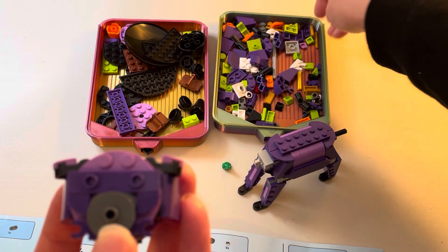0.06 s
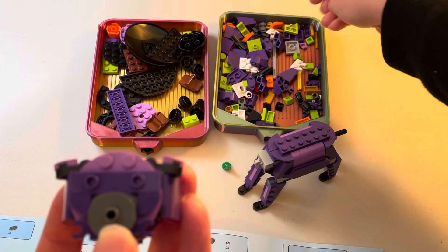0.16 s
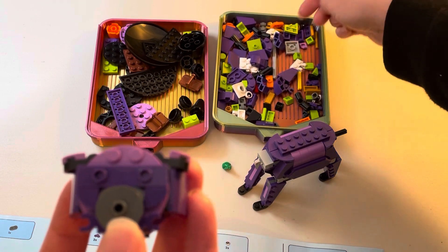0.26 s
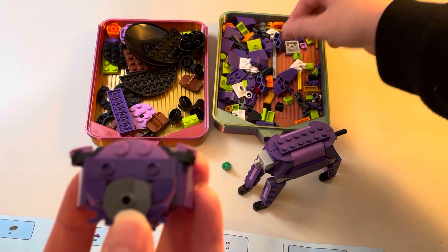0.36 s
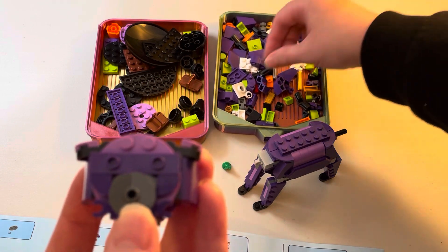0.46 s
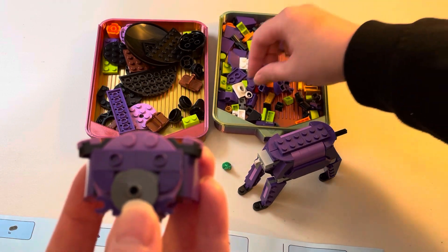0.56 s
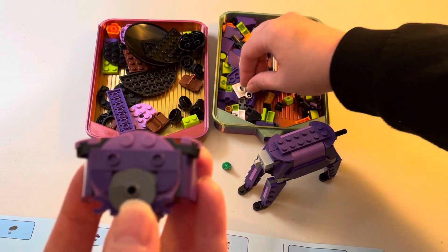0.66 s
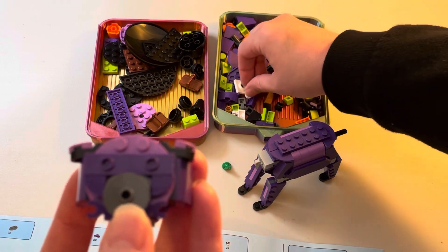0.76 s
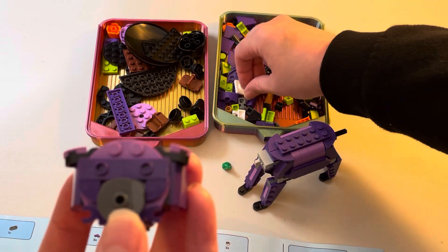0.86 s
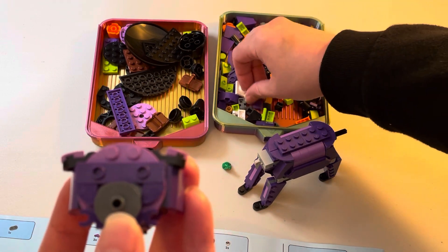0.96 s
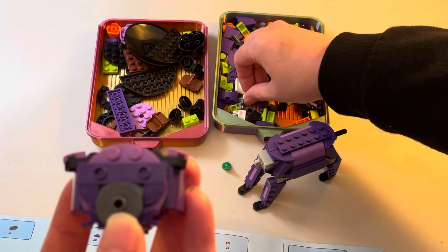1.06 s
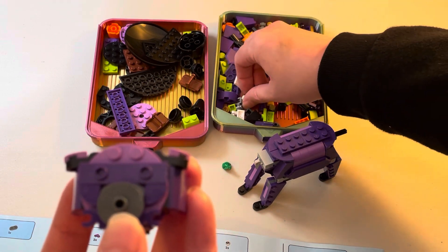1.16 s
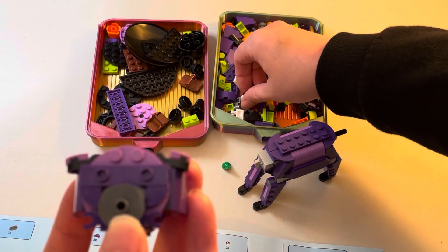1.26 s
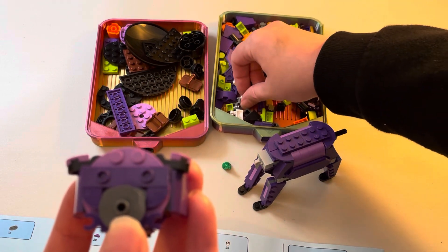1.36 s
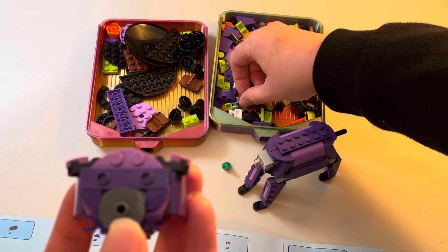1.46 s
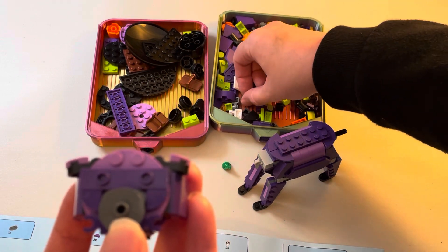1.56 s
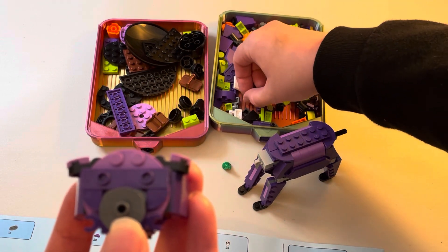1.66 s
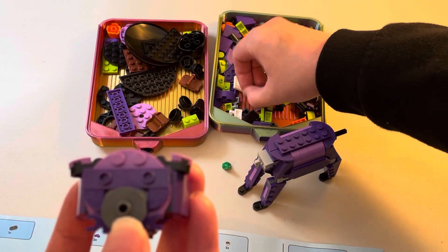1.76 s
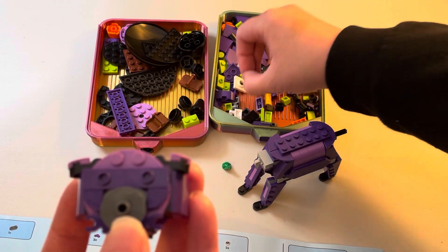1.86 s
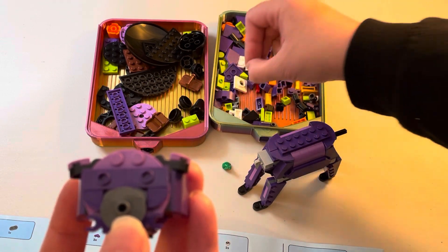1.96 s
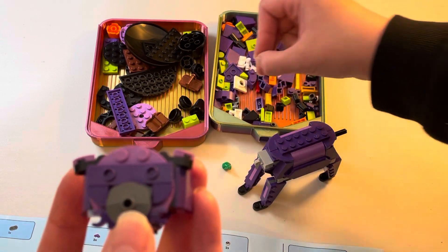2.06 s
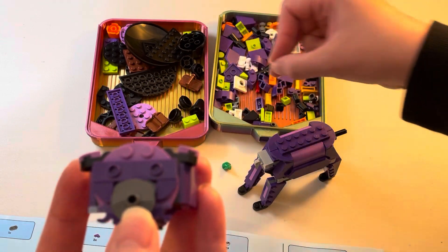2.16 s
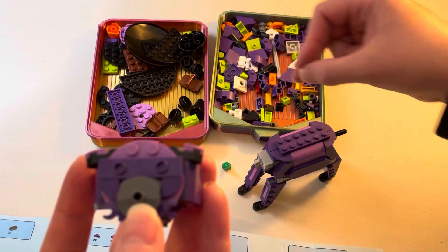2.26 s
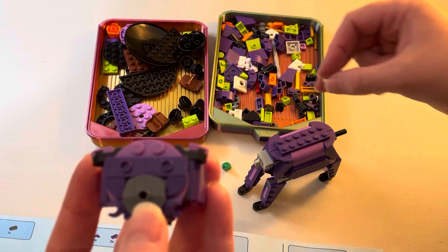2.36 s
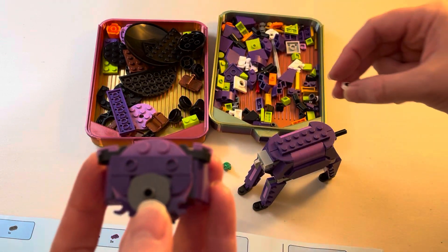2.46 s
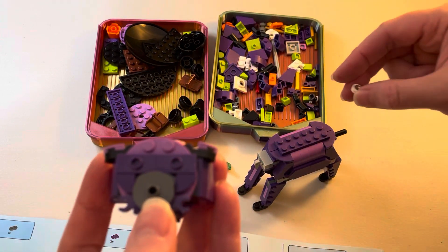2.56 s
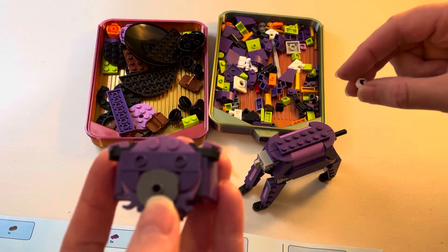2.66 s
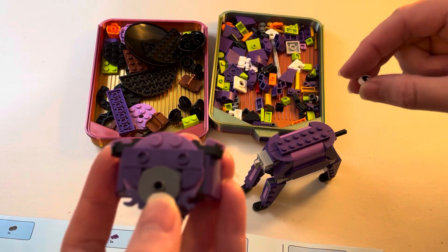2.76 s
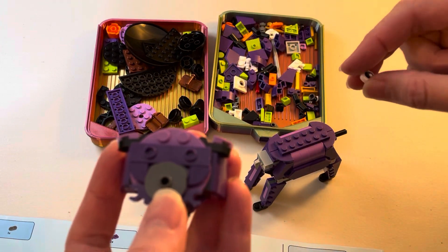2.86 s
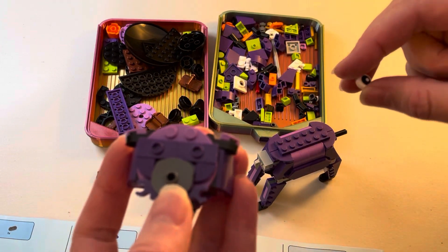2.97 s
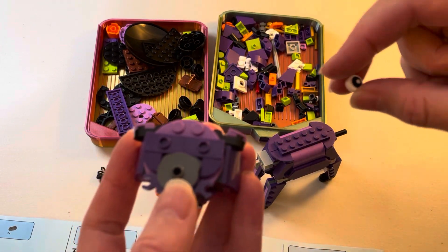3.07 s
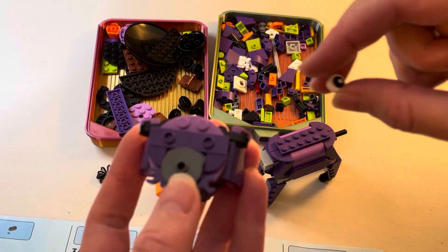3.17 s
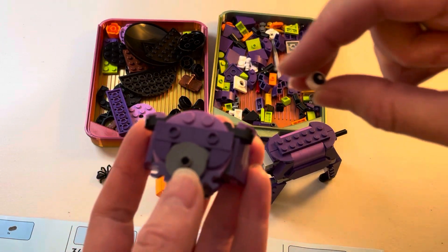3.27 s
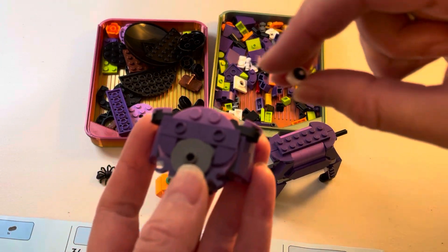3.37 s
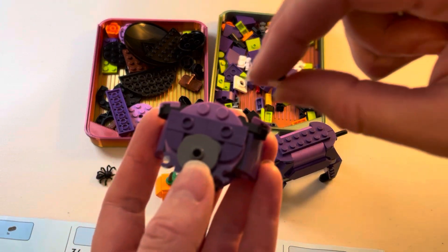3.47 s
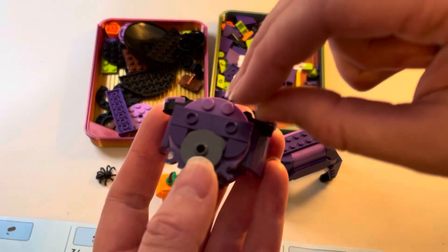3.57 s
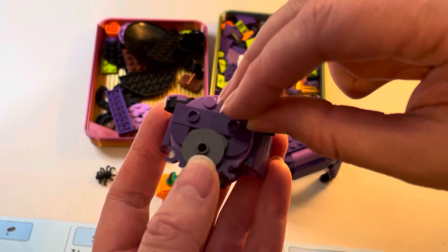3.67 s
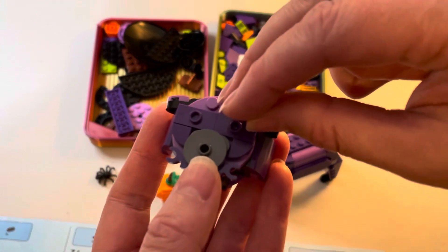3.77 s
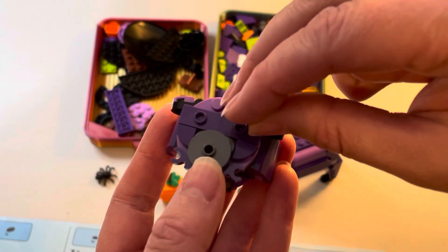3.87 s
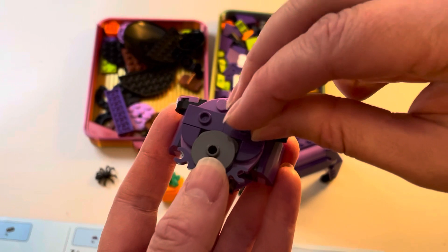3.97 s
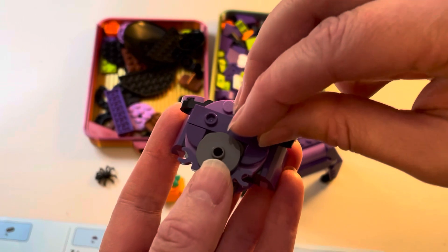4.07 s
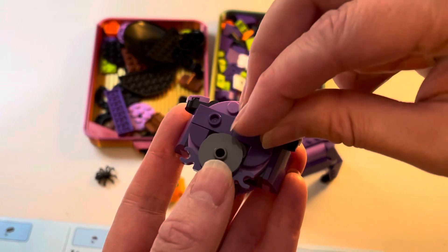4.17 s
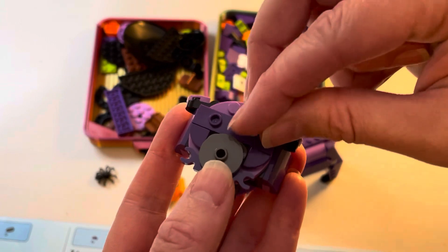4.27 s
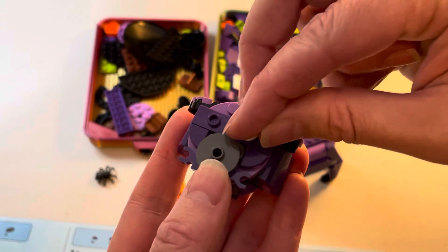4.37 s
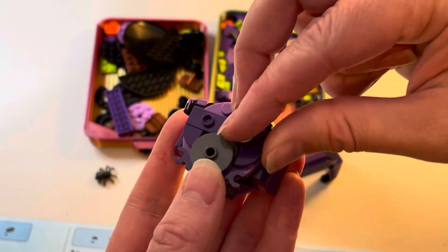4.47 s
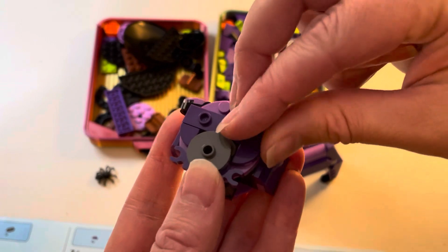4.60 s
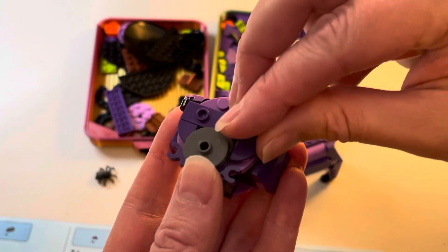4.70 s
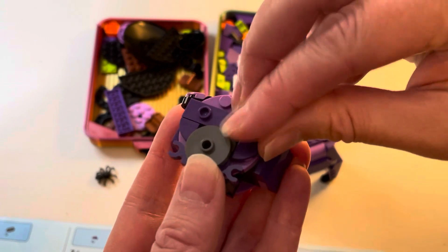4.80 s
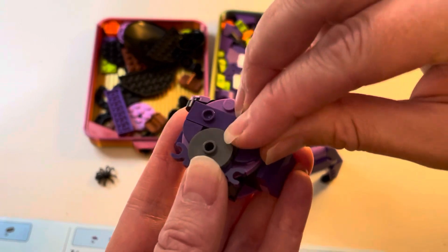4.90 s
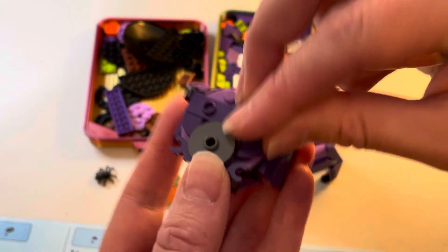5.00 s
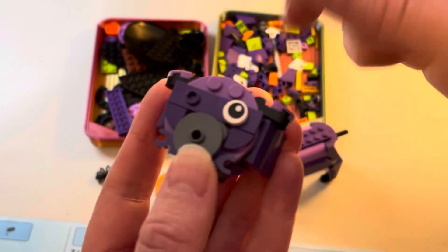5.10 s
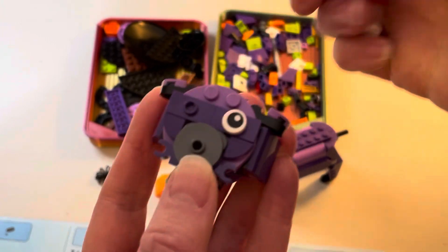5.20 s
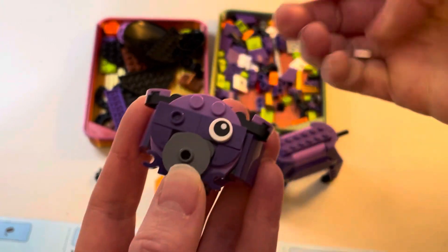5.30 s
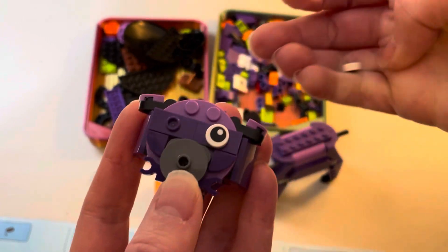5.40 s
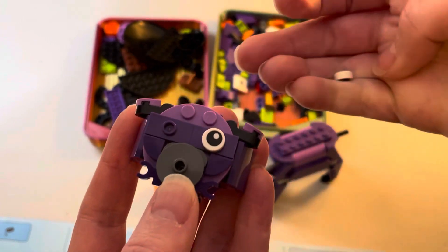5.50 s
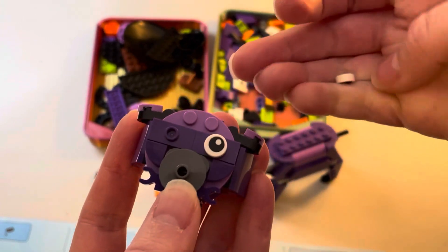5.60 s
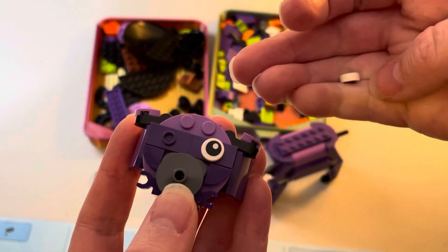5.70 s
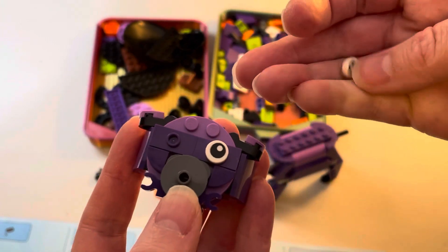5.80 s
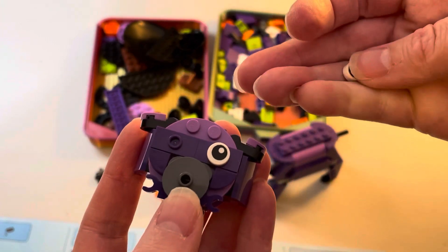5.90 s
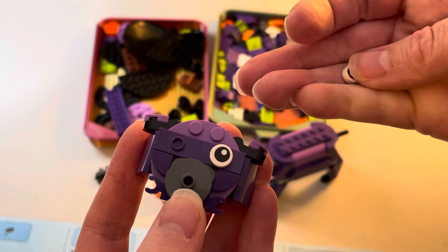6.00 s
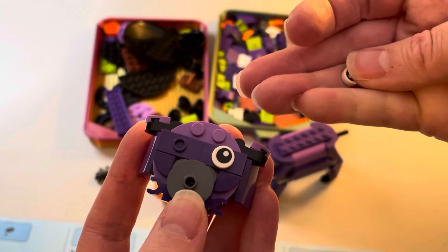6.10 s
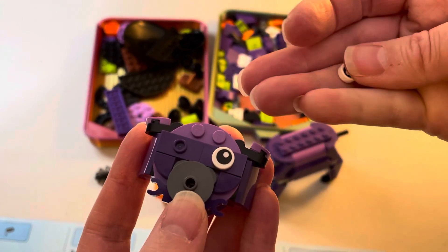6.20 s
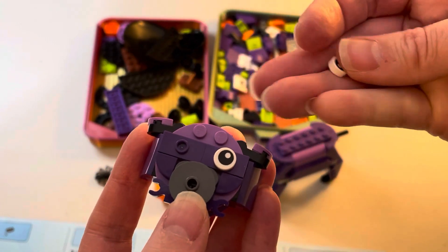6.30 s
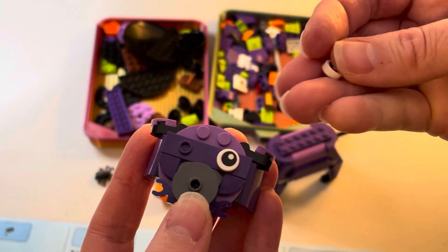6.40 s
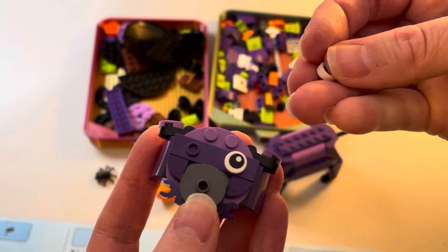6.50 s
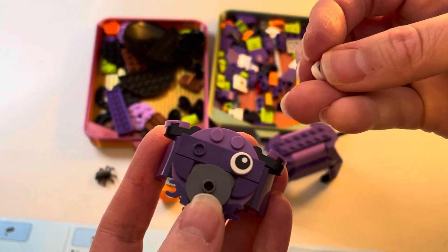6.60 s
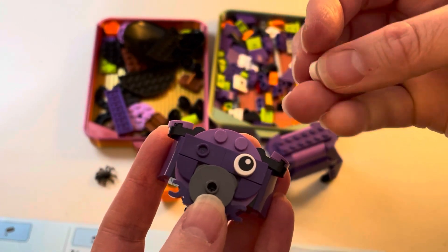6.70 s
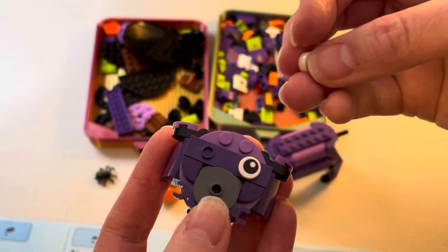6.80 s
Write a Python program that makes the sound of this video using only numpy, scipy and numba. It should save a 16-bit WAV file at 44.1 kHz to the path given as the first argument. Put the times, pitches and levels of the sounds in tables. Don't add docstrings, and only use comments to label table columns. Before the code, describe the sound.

In a small quiet room, fingers dig through a tray of loose plastic bricks, making a short avalanche of bright clatter with dull tray and table thuds. The rattling thins out and stops. After near silence, tiny clicks close to the microphone lead to one very sharp snap as a piece presses onto a hollow model, then faint skin rubbing over low room hum.

```python
import sys
import numpy as np
from scipy import signal
from scipy.fft import rfft, irfft, next_fast_len
from scipy.io import wavfile
from scipy.ndimage import uniform_filter1d
from numba import njit

SR = 44100
rng = np.random.default_rng(int(sys.argv[2]) if len(sys.argv) > 2 else 0)


def voltage_ratio(decibels):
    exponent = np.asarray(decibels, float) / 20
    return 10 ** exponent


def file_out(sig):
    cols = np.atleast_2d(sig).T
    lim = np.clip(cols, -1, 1)
    pcm = np.round(lim * 32767).astype(np.int16)
    wavfile.write(sys.argv[1], SR, pcm)


N = 302085

# pitch in Hz, 60 dB decay in seconds, level in dB.
TRAY_MODES = [(279, 0.07, 0), (329.2, 0.06, -7.5), (430, 0.045, 3.5), (543, 0.026, 2), (630, 0.034, 0.5),
              (891.5, 0.03, -5.5), (1270, .02, -8)]
# peak, rise and fall in seconds, rattle in dB, tray in dB.
HEAP_PUSHES = [(0.03, 0.058, 0.032, -55, -55), (0.692, 0.0038, 0.2, -44.5, -61.5),
               (0.775, 0.035, 0.034, -36, -47), (0.962, 0.019, 0.093, -34, -50.5),
               (1.04, .05, 0.042, -46.5, -62), (1.078, 0.0042, 0.021, -33.5, -39.5),
               (1.146, 0.014, 0.073, -40.5, -52.5), (1.18, 0.035, 0.025, -48, -54),
               (1.3, 0.091, 0.2, -69, -64), (1.353, 0.002, 0.045, -46.5, -57.5),
               (1.475, 0.067, 0.023, -51.5, -59), (1.575, 0.01, 0.0074, -54, -72),
               (1.645, 0.057, 0.038, -72, -100), (2.31, 0.0044, 0.024, -78, -75),
               (2.378, 0.0082, 0.029, -84, -75)]
TRAY_DETUNE = 0.1


def at(points, hz):
    point_hz, value = np.transpose(points)
    return np.interp(np.log(hz + 1), np.log(point_hz + 1), value)


def colour(x, gain):
    size = next_fast_len(N + 8192)
    spectrum = rfft(x, size) * gain(np.fft.rfftfreq(size, 1 / SR))
    return irfft(spectrum, size)[..., :N]


def unit(x):
    return x / np.sqrt(np.mean(x ** 2))


@njit
def rings(start, hz, t60, size, n):
    out = np.zeros(n)
    for k in range(len(start)):
        turn = np.exp(2j * np.pi * hz[k] / SR - np.log(1000) / (t60[k] * SR))
        z = size[k] + 0j
        for i in range(int(start[k]), min(int(start[k] + t60[k] * SR), n)):
            out[i] += z.imag
            z *= turn
    return out


def strike(s, db, modes, detune=0.022, scatter_db=2.5):
    hz, t60, mode_db = np.transpose(modes)
    chance = rng.standard_normal((len(s), len(hz), 2))
    polarity = (-1.) ** np.arange(len(hz))
    size = voltage_ratio(db[:, None] + mode_db + scatter_db * chance[..., 0]) * polarity
    tuned = hz * (1 + detune * chance[..., 1])
    start = np.repeat(s * SR, len(hz))
    return rings(start, tuned.ravel(), np.tile(t60, len(s)), size.ravel(), N)


def crack(s, db, low_hz, high_hz):
    pulses = np.zeros(N)
    np.add.at(pulses, (s * SR).astype(int), voltage_ratio(db))
    sos = signal.butter(3, [low_hz, high_hz], "bandpass", fs=SR, output="sos")
    band = signal.sosfilt(sos, pulses) * SR / (2 * (high_hz - low_hz))
    return band - 0.081 * np.roll(band, int(0.00017 * SR))


def patter(count, size, low_hz, high_hz, cycles, spread_db):
    when, luck = rng.random((count, 2)).T
    place = (np.arange(size) + rng.random((count, size))) / size
    hz = low_hz + (high_hz - low_hz) * place
    t60 = cycles / np.sqrt(hz * 4000)
    force = voltage_ratio(-spread_db * np.log(luck + 1 / 100))[:, None] * rng.standard_normal((count, size))
    start = np.repeat(when * N, size)
    return unit(rings(start, hz.ravel(), t60.ravel(), (force / np.sqrt(t60)).ravel(), N))


def swells(rows, column):
    rows = np.array(rows)
    late = np.arange(N) / SR - rows[:, :1]
    rise, fall, db = rows[:, [1]], rows[:, [2]], rows[:, [column]]
    span_db = 20
    return voltage_ratio(db - span_db * np.maximum(-late / rise, late / fall)).sum(axis=0)


def knocks():
    # start in seconds, peak in dB, pitch in Hz, treble in dB.
    raked = [(0.6931, -34, 3100, -13), (0.7013, -36.5, 3550, -16), (0.7093, -32, 5160, -24),
             (0.7274, -34.5, 5010, -18.5), (0.7342, -34.5, 4540, -23.5), (0.7448, -31, 4730, -23),
             (0.7587, -26.5, 4730, -16), (0.7628, -31, 5010, -23.0), (0.7753, -25, 5270, -19.5),
             (0.7788, -30.5, 4670, -17), (0.782, -32.5, 1740, -14.5), (0.7868, -27.5, 4580, -18.5),
             (0.7983, -33.5, 5360, -17.5), (0.802, -32.5, 5060, -17), (0.8176, -37.7, 5060, -22),
             (0.8326, -39.5, 2110, -18.5), (0.8395, -42, 3180, -16.5), (0.843, -42, 5490, -17),
             (0.8727, -49.5, 1700, -27), (0.8764, -53, 1850, -20.5), (0.8987, -49.5, 4860, -22.5),
             (0.9048, -50.5, 2230, -26.5), (0.9181, -45, 2840, -26.5), (0.9235, -46, 2920, -28),
             (0.9326, -48.5, 1890, -19), (0.9449, -42.5, 3010, -17.5), (0.956, -29.5, 4130, -12),
             (0.9615, -27.5, 5270, -13.5), (0.9663, -27, 5310, -5), (0.9757, -21.5, 4670, -13),
             (0.9822, -28, 5380, -17.0), (0.9857, -28, 4670, -15), (0.9895, -22.5, 4750, -16),
             (1.0092, -27.5, 4690, -11), (1.0194, -30, 4750, -14.5)]
    # start in seconds, peak in dB, pitch in Hz,
    # treble in dB.
    dug = [(1.0346, -33, 4750, -10), (1.0404, -32.5, 4730, -13.7), (1.0482, -31, 5400, -15),
           (1.0524, -32.5, 3180, -11.4), (1.0589, -35.5, 3350, -19), (1.0761, -28, 3200, -22.2),
           (1.0834, -25.5, 1950, -24), (1.0865, -29.5, 3290, -26), (1.1053, -38.5, 4880, -21.8),
           (1.1172, -33, 1850, -23.0), (1.1249, -37, 1800, -18), (1.1424, -33.5, 5180, -16),
           (1.1504, -28, 3350, -20), (1.1538, -33.5, 3050, -20.9), (1.1701, -34.5, 5190, -22),
           (1.1766, -29.5, 3280, -20.2), (1.1805, -25.5, 3080, -19), (1.1861, -35, 2410, -13),
           (1.2177, -36, 5050, -15), (1.2246, -34.5, 5060, -22.6), (1.2434, -43, 1800, -23),
           (1.273, -48, 3310, -26), (1.2958, -36.5, 5070, -33), (1.3035, -47, 2330, -30),
           (1.322, -41, 5200, -43), (1.3304, -61, 2520, -31), (1.3517, -38.5, 4710, -22),
           (1.3627, -26.5, 5230, -22), (1.3736, -43.5, 4860, -24.5), (1.3932, -32, 4670, -35),
           (1.3998, -39, 4730, -32), (1.4159, -35.5, 4520, -36), (1.4279, -43, 2100, -32),
           (1.4331, -30.5, 4840, -30), (1.4393, -40.1, 2020, -37), (1.4523, -39, 4770, -30),
           (1.4659, -46, 2020, -30), (1.4709, -35, 4700, -20), (1.4796, -36, 2500, -30),
           (1.4936, -46, 2060, -28), (1.4972, -43.5, 1930, -27), (1.5027, -55, 3000, -27.1),
           (1.507, -54, 2530, -26), (1.511, -50.3, 3180, -29), (1.5184, -66, 2020, -28)]
    # start in seconds, peak in dB, pitch in Hz,
    # tray in dB.
    settling = [(0.0144, -43, 1540, -11), (0.028, -40, 1800, -7), (0.036, -43, 3020, -15),
                (0.0471, -47, 4850, -4), (0.054, -48, 1590, -15), (0.0844, -65, 980, 1),
                (1.559, -48, 3000, -22), (1.5622, -49, 3020, -31), (1.5703, -38.5, 3110, -41),
                (1.576, -44, 1910, -30), (1.583, -61, 4200, -28), (1.6242, -54, 4000, -32),
                (1.6456, -45, 2150, -38), (1.679, -59.5, 3800, -19), (2.284, -56, 5280, -16),
                (2.3074, -47, 3090, -19), (2.3078, -47, 5460, -20), (2.309, -56, 2090, -25),
                (2.3115, -46.5, 1107, -10), (2.3609, -51, 1067, -4.5), (2.374, -56, 1020, -13),
                (2.3751, -52, 2985, -13), (2.376, -64, 5130, -17), (2.38, -53, 2290, -16),
                (2.4982, -58, 1140, -13), (2.499, -58.5, 2300, -27)]
    hard_tray_db, soft_treble_db = -32, -39
    hard, soft = np.r_[raked, dug], np.array(settling)
    zero, one = np.zeros(len(hard)), np.ones(len(soft))
    hard = np.c_[hard, zero + hard_tray_db, zero]
    soft = np.c_[soft[:, :3], one * soft_treble_db, soft[:, 3], one]
    return np.r_[hard, soft].T


def tumble():
    # pitch in Hz, 60 dB decay in seconds, level in dB.
    stud = [(5965, 0.0057, 0), (6700, 0.026, 3.5), (7857, 0.03, -3), (8140, 0.009, -3.5),
            (5170, 0.0012, -20.5), (4200, 0.0021, -2)]
    # pitch in Hz, 60 dB decay in seconds, level in dB.
    shell = [(3030, 0.006, 6), (3450, 0.0057, 6), (2700, 0.008, -1.5)]
    # pitch in Hz, 60 dB decay in seconds, level in dB.
    edge = [(9240, 0.035, -1), (10480, 0.0098, 6), (12730, 0.0072, -6), (12300, 0.0051, -2.35),
            (15300, .003, 3), (14600, .003, 0), (8955, 0.012, -1)]
    # pitch in Hz, 60 dB decay in seconds, level in dB.
    body = [(2150, 0.017, -0.5), (1330, 0.0072, 0), (923, .006, -5), (1842, 0.001715, -7)]
    s, db, hz, treble_db, tray_db, soft = knocks()
    dull_db = soft * 6 * np.minimum(np.log2(hz / 3600), 0)
    stud_db = -1.5 + 0.15 * treble_db + 2 * dull_db
    s = s + 0.0008
    out = strike(s, db + tray_db - 2, np.array(TRAY_MODES) * [1, 0.6, 1], detune=TRAY_DETUNE)
    out += crack(s, db + dull_db - 10, low_hz=890, high_hz=7150)
    out += crack(s, db + treble_db - 1, low_hz=6976, high_hz=16000)
    for bounce in range(2):
        late, shift, luck = rng.random((len(s), 3)).T
        if bounce:
            s = s + 0.0007 + 0.002 * late
            db = db - 1.1 - 4 * luck
        pitch = hz * (1 + 0.12 * bounce * (shift - 0.5))
        out += rings(s * SR, pitch, 11 / hz, voltage_ratio(db - 2.5), N)
        out += strike(s, db + dull_db - 13.5, np.r_[shell, body], detune=0.2, scatter_db=1.5)
        out += strike(s, db + stud_db - 7, stud, detune=0.1, scatter_db=3)
        out += strike(s, db + treble_db - 4, edge, detune=0.04, scatter_db=3)
    walls = rng.standard_normal(200) * np.exp(-np.arange(200) / (0.0012 * SR))
    out = out + 0.3 * signal.fftconvolve(out, walls / np.linalg.norm(walls))[:N]
    return out * voltage_ratio(-1.5)


def rustle():
    # frequency in Hz, level in dB.
    tone = [(600, -9), (1200, -6), (2000, 0.5), (3000, -3), (3800, -3), (5000, 7.5), (6300, -7),
            (7600, -7.5), (8600, 1.5), (10000, -13.5), (12800, -11.5), (14400, -20.5), (15700, -17),
            (16000, -38.5)]
    bed = patter(count=6500, size=10, low_hz=500, high_hz=15800, cycles=20, spread_db=2.6)
    bed = unit(colour(bed, lambda f: voltage_ratio(at(tone, f))))
    return bed * swells(HEAP_PUSHES, column=3) * voltage_ratio(-0.5)


def thuds():
    # pitch in Hz, 60 dB decay in seconds, level in dB.
    table = [(76.1, 0.014, 0), (102, 0.167, -0.47), (150.7, 0.16, -1)]
    # start in seconds, peak in dB, pitch in Hz.
    bumps = [(0.009, -44.5, 197), (0.021, -31, 258), (0.039, -34, 325), (0.694, -41.5, 116),
             (0.702, -35.5, 142), (0.788, -42, 296), (0.974, -43, 430), (0.962, -32, 102), (0.99, -36, 68),
             (1.009, -31.5, 81.66), (1.011, -33.5, 146), (1.031, -33.5, 150), (1.077, -36.5, 87.6),
             (1.077, -41, 426), (1.075, -31, 730), (1.078, -34.5, 1000), (1.083, -37, 603),
             (1.084, -38.5, 342), (1.087, -35.5, 940), (1.086, -36.5, 96), (1.147, -37, 284.3),
             (1.223, -42, 62), (1.476, -35.5, 145), (1.556, -40.5, 101)]
    s, db, hz = np.transpose(bumps)
    out = rings(s * SR, hz, 9 / hz, voltage_ratio(db - 1.5), N)
    out -= rings(s * SR, hz, 1.6 / hz, voltage_ratio(db - 1.5), N)
    push = swells(HEAP_PUSHES, column=4)
    for modes, floor_db in (TRAY_MODES, 0), (table, -4.5):
        s, luck = rng.random((900, 2)).T
        shake = strike(s * N / SR, -3 * np.log(luck + 1 / 100), modes, detune=TRAY_DETUNE)
        out += push * unit(shake) * voltage_ratio(floor_db + 5)
    return out


def snaps():
    # start in seconds, then stud, shell, treble
    # and hollow levels in dB.
    clicks = [(4.048, -52.5, -77, -79, -69), (4.2452, -34.5, -48, -40.5, -57.5),
              (4.273, -65, -59, -67.5, -91), (4.359, -58, -47.5, -53, -54),
              (4.3939, -32, -32.5, -20.5, -38.5), (4.395, -62, -55.5, -48.5, -63),
              (4.588, -62, -67, -63.5, -68.5), (4.6566, -40, -41, -66.5, -67.5),
              (4.747, -70, -85.5, -87, -95), (4.798, -70.5, -60.5, -75.5, -63.5),
              (4.8085, -9.5, -21, -3.5, -54), (5.0236, -36, -42, -37, -54),
              (5.0507, -40, -39.5, -78, -41.5)]
    s, stud_db, shell_db, treble_db, hollow_db = np.transpose(clicks)
    body_db = 22 + 2.62 * shell_db
    s = s + 0.0004

    def tone(hz, t60, db):
        return rings(s * SR, hz + 0 * s, t60 + 0 * s, voltage_ratio(db), N)

    ring = tone(5640, 0.0052, stud_db + 0.5) + tone(5700, 0.1, stud_db - 44)
    ring += tone(3200, 0.014, hollow_db) + tone(10300, 0.0075, treble_db - 15)
    ring = signal.sosfilt(signal.butter(3, 2200, "highpass", fs=SR, output="sos"), ring)
    click = crack(s, stud_db - 12.5, low_hz=4900, high_hz=7870)
    click -= crack(s, shell_db - 7, low_hz=1950, high_hz=4024)
    click += crack(s, body_db, low_hz=1250, high_hz=2400)
    click += crack(s, treble_db, low_hz=8000, high_hz=16200)
    click += strike(s, body_db - 16.5, np.array(TRAY_MODES) * [1, 0.4, 1])
    echoes = voltage_ratio(-13) * np.roll(click, int(0.0027 * SR)) + voltage_ratio(-21) * np.roll(click, int(0.0043 * SR))
    return click + echoes, ring


def rub():
    # peak, rise and fall in seconds, skin hiss in dB, plastic in dB.
    strokes = [(0.19, .03, 0.12, -90, -102), (0.298, 0.11, 0.028, -91, -101),
               (3.766, 0.071, 0.093, -100, -90), (3.856, 0.037, 0.048, -99, -90),
               (3.96, 0.087, .1, -101, -97), (4.235, 0.087, 0.0091, -99.5, -84),
               (4.71, .02, 0.068, -98, -91), (4.8, 0.029, 0.008, -100, -78), (4.97, 0.017, 0.061, -99, -91),
               (5.018, 0.015, 0.012, -82, -70.5), (5.07, 0.031, 0.12, -93, -97),
               (5.16, 0.15, 0.046, -80.5, -75), (5.464, 0.017, 0.019, -82.5, -103),
               (5.578, 0.092, .08, -97.5, -100), (5.738, 0.09, 0.12, -86.5, -94),
               (6.19, 0.13, 0.087, -99.5, -100), (6.306, 0.19, 0.073, -80, -90),
               (6.416, 0.11, 0.05, -88, -99), (6.555, 0.089, 0.032, -88.5, -99.5),
               (6.73, .1, 0.077, -93.5, -107)]
    skin = patter(count=15000, size=4, low_hz=6800, high_hz=15700, cycles=12, spread_db=1.5)
    plastic = patter(count=10000, size=3, low_hz=4200, high_hz=7200, cycles=20, spread_db=1.5)
    skin = skin * swells(strokes, column=3) * voltage_ratio(8.5)
    return skin + plastic * swells(strokes, column=4) * voltage_ratio(2.5)


def diffuse(shared, differing):
    # frequency in Hz, share of diffuse sound that differs.
    apart = [(40, .2), (150, .33), (500, .65), (1500, .62), (2300, .45), (3200, .14), (6000, .14),
             (6900, .02), (8400, .02), (16000, .06)]
    side = colour(differing, lambda f: np.clip(at(apart, f), 0, 1))
    return np.array([shared + side, shared - side])


def reverb(x, t60=0.22, level_db=-39.0, dull_hz=9000):
    t = np.arange(int(0.3 * SR)) / SR
    fade = np.exp(-np.log(1000) * t / t60) * (1 - np.exp(-(t / 0.0024) ** 2))
    tails = rng.standard_normal((2, len(t))) * fade
    wet = signal.fftconvolve(x[None], tails * voltage_ratio(level_db), axes=1)[:, :N]
    return diffuse(*colour(wet, lambda f: 1 / np.sqrt(1 + (f / dull_hz) ** 2)))


def room():
    # frequency in Hz, density in dB per Hz.
    air_tone = [(25, -93), (40, -82), (62, -76), (125, -87), (160, -87), (250, -98.5), (400, -110),
                (630, -114.5), (1000, -118), (1600, -123), (2500, -122.5), (5000, -127.5), (9000, -131),
                (13000, -137), (16000, -145)]
    air = colour(rng.standard_normal((2, N)), lambda f: voltage_ratio(at(air_tone, f)) * np.sqrt(SR / 2))
    hum = colour(rng.standard_normal((2, N)), lambda f: 1 / (1 + ((f - 102) / 12) ** 2))
    rumble = colour(rng.standard_normal((2, N)), lambda f: 1 / (1 + ((f - 310) / 90) ** 2))
    span = int(0.5 * SR)
    drift = unit(uniform_filter1d(uniform_filter1d(rng.standard_normal(N), span), span))
    return diffuse(*(air + unit(hum) * voltage_ratio(-63) + unit(rumble) * voltage_ratio(-77 + 2 * drift)))


def scene():
    blows = tumble()
    tray = rustle() + blows + thuds()
    click, ring = snaps()
    skin = rub()
    aside = colour(0.04 * blows + 0.09 * click, lambda f: f > 6000) * np.array([[1], [-1]])
    scatter = rng.standard_normal(400) * np.exp(-np.arange(400) / 90)
    scattered = signal.fftconvolve(tray, scatter / np.linalg.norm(scatter))[:N]
    wide = diffuse(tray, 0.7 * scattered)
    click_to_room = colour(click, lambda f: 1 + 0.23 * (f < 4500))
    to_room = tray * voltage_ratio(6) + click_to_room + skin + ring * voltage_ratio(-6)
    return wide + aside + click + ring + skin + reverb(to_room) + room()


def low_pass(x):
    return signal.sosfilt(signal.butter(12, 16570, fs=SR, output="sos"), x)


def record(dry):
    # frequency in Hz, lead of the right port in radians.
    lead = [(0, 0), (4000, .1), (5500, 1.1), (6300, 1.5), (6950, 3.1), (8350, 3.15), (9650, 1.6),
            (11000, .1), (11900, -.1), (13100, -1.6), (14200, -3.1), (15100, -3.2), (16500, -5)]
    # frequency in Hz, left minus right in dB.
    tilt = [(50, -2.5), (110, -5.5), (300, -3), (800, -2.5), (2200, -.3), (6900, .2), (8400, .2),
            (16000, -.8)]

    def ports(hz):
        half = voltage_ratio(at(tilt, hz) / 2) * np.exp(-0.5j * np.interp(hz, *np.transpose(lead)))
        return np.array([half, 1 / half]) / (1 + (hz / 15950) ** 150)

    return low_pass(colour(dry, ports))


dry = scene()
out = record(dry)
file_out(out)
```